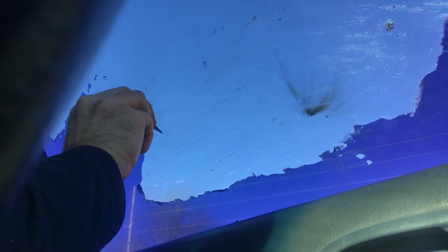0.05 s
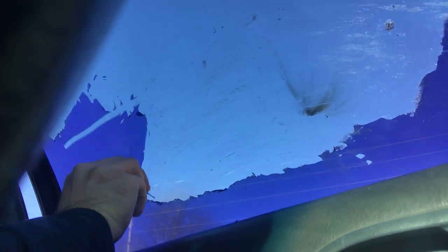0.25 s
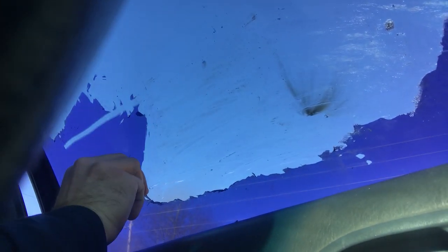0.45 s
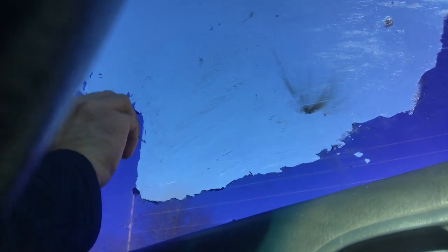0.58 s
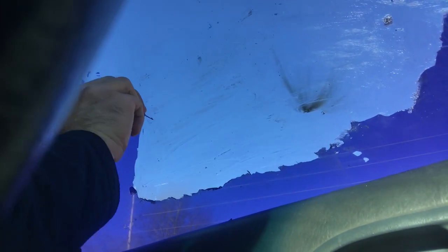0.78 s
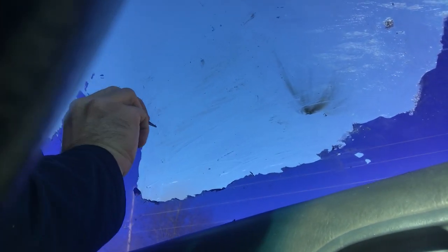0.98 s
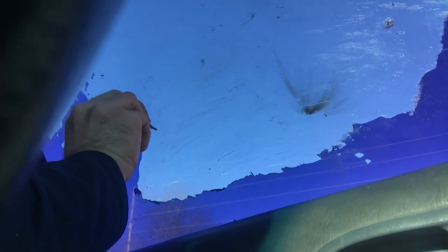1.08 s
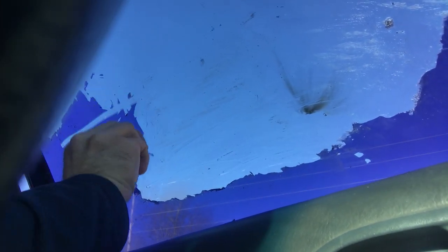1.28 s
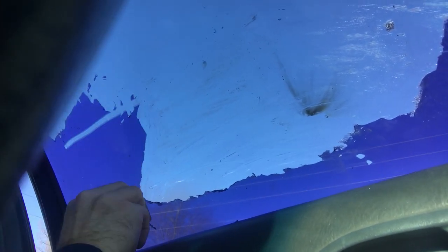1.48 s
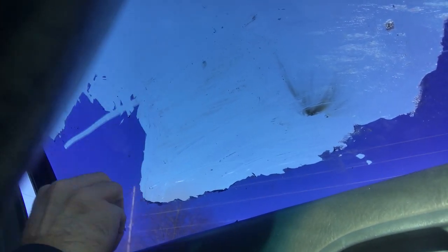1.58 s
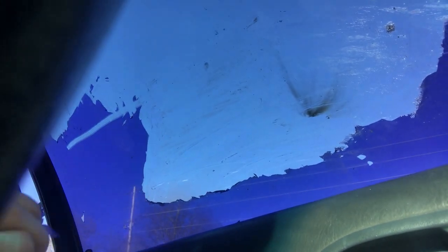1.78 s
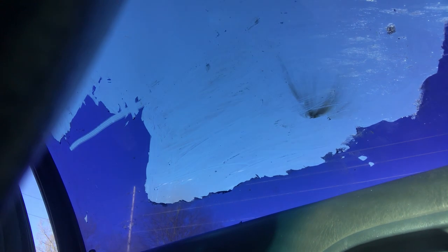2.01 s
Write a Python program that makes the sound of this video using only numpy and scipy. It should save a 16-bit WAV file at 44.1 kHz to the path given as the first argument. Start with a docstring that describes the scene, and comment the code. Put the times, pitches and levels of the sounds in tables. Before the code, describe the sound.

Blade scraping on a car window: two quick gritty strokes, with sharp glassy ticks and dull thuds.

```python
"""Razor blade on a car window

A razor blade scrapes burnt tint film off the inside of a car window, heard from close by in the cabin. Two
strokes rasp down the pane: sprays of tiny fractures ring the pressed blade and the glass, and the edge catches.
Around and between them the blade ticks (short cracks and rings) and scuffs the film (sparser sprays). The pane
thuds in its low modes; filtered noise makes the arm's rumble, sleeve and cabin air."""
import sys
import numpy as np
from scipy import signal
from scipy.fft import rfft, irfft, next_fast_len
from scipy.io import wavfile
from scipy.ndimage import uniform_filter1d, map_coordinates

SR = 44100
rng = np.random.default_rng(int(sys.argv[2]) if len(sys.argv) > 2 else 0)


def transcribe(signal):
    """Save signal, clipped to [-1, 1], as a 16-bit WAV file at the path in sys.argv[1]."""
    frames = np.atleast_2d(signal).T
    limited = np.clip(frames, -1, 1)
    pcm = np.round(limited * 32767).astype(np.int16)
    wavfile.write(sys.argv[1], SR, pcm)


N = 90404  # length in samples

# Rumble of the moving arm, before RUMBLE_DB: start_s, level_db
ARM_MOVES = [(0, -49), (.18, -61), (.28, -44), (.44, -48), (.55, -55.5), (.95, -53), (1.33, -50),
             (1.5, -44), (1.68, -58.5), (1.88, -46.5), (2.05, -65.5)]
# The sleeve brushes past at the end: start_s, level_db
SLEEVE_BRUSH = [(1.87, -70), (1.95, -64), (2.05, -68.5)]
# Noise colours of the rumble and the still air: pitch_hz, relative_level_db
RUMBLE_COLOUR = [(22, -45), (42, 4.5), (80, 1), (125, -3.5), (600, -42), (2000, -69)]
AIR_COLOUR = [(100, -0.5), (700, -7.5), (1500, -12), (7000, -22), (16000, -37.5)]
RUMBLE_DB, AIR_DB = 1, -63.5

# Blade ticks on the glass, before TICK_DB: start_s, level_db, treble_tilt_db_per_octave, favoured_pitch_hz
BLADE_TICKS = [(.0005, -35.5, -4.5, 2100), (0.036, -32, -3, 3050), (0.1352, -28.5, -2.5, 2100),
               (0.395, -42.5, -4, 3400), (0.5525, -33.5, -1, 1790), (0.5747, -35.5, -3, 1940),
               (0.661, -34.5, -3, 2130), (0.7549, -47.5, -10.5, 1220), (0.7915, -32, 0, 2620),
               (0.796, -40, 4.5, 4400), (0.8, -48, -14, 2980), (0.8067, -50, 0, 3100),
               (0.8935, -35, -2.5, 3950), (0.9111, -38.5, -2.5, 2030), (0.9701, -35.5, -0.5, 1950),
               (1.022, -32.5, -1.5, 2150), (1.0356, -38.5, -3.5, 1170), (1.0739, -26, -2, 2850),
               (1.1368, -39, -11, 1220), (1.1468, -37.5, -1.5, 2750), (1.5664, -41.5, -1.5, 6500),
               (1.5895, -26.5, -3.5, 2640), (1.6057, -32.5, -4, 2100), (1.656, -34, -3.5, 2400),
               (1.661, -40.5, -0.5, 6000), (1.677, -41.5, -8.5, 6160), (1.695, -41.5, -5, 6170),
               (1.707, -44, -5, 6100), (1.7186, -44.5, -6.5, 6140), (1.806, -36.5, 0, 995),
               (1.826, -45, -6, 1840)]
# Resonances of the tapped blade and glass, before a random change per tick: pitch_hz, relative_level_db
TAPPED_BLADE = [(950, -4), (1220, -2.5), (1550, -7), (2100, 0), (2330, 0), (3040, -0.5), (3500, -3),
                (4390, -14), (6000, -9), (6600, -12)]
# Noise colour of a tick's crack: pitch_hz, relative_level_db
CRACK_COLOUR = [(150, 7), (400, -4), (800, -11), (1300, -0.5), (6800, -9), (10000, -21), (16000, -28)]
BLADE_WIDTH_HZ, BLADE_LOSS = 110, 0.05  # resonance width: a fixed part plus a share of the pitch
TICK_DB, CRACK_DB, CRACK_T60_S = 15, 2.5, 0.018  # energy of a tick; its crack against its ring; crack decay
FAVOUR_DB, FAVOUR_OCTAVES = 4.5, 0.35  # boost near the favoured pitch, and its spread
BEND_S = 0.002622  # travel time of a 1 kHz bending wave in the glass; treble arrives first
TOP_HZ = 16150  # nothing is kept from here up

# The pane thuds, before THUD_DB: start_s, level_db, centre_hz
PANE_THUDS = [(0.136, -37.5, 205), (0.2021, -23, 190), (0.2274, -36, 262), (.285, -33, 168),
              (0.358, -37.5, 352), (0.8015, -31, 157), (0.933, -38, 209), (1.046, -37.5, 170),
              (1.081, -36.5, 158), (1.138, -39, 142), (1.171, -37.5, 111), (1.381, -26, 424),
              (1.381, -25, 96), (1.4719, -25.5, 147), (1.509, -31.5, 111), (1.593, -35.5, 106),
              (1.829, -45.5, 109)]
# Low modes of the pane in its frame, before small random changes: pitch_hz, level_db, decay_60db_s
PANE_MODES = [(78.06, -14, 0.86), (107.4, -3.5, 0.15), (142, 2, 0.052), (180, -2.5, 0.055),
              (248, -7.5, 0.048), (408, -3, 0.061)]
THUD_DB, THUD_RISE_S, THUD_OCTAVES = 5, 0.0039, 0.7  # octaves: spread of modes that one thud reaches

# The edge catches in the film: start_s, level_db, decay_60db_s
EDGE_CATCHES = [(0.2009, -22, 0.023), (.2230, -28.5, 0.097), (.2375, -33.5, 0.05), (.288, -39, 0.026),
                (.3548, -31.5, 0.053), (1.3715, -36, 0.055), (1.3822, -33.5, 0.054), (1.4664, -29.5, 0.06),
                (1.4805, -33, 0.024)]
# Light scuffs of the film: start_s, level_db, decay_60db_s
LIGHT_SCUFFS = [(.602, -44.5, 0.068), (.899, -55, 0.19), (.936, -44.5, 0.019), (1.657, -40, 0.077),
                (1.8053, -37.5, 0.028), (1.826, -39.5, 0.066), (1.841, -43, 0.08)]
# Colours of catches and scuffs; the sleeve shares the scuff colour: pitch_hz, relative_level_db
CATCH_COLOUR = [(100, 9), (280, 15.5), (700, -1.5), (2000, -2), (3800, 2), (5200, -14.5), (8000, -24),
                (16000, -53)]
SCUFF_COLOUR = [(200, -3), (600, 0.5), (1700, 1.5), (3300, -6.5), (6500, -23), (16000, -43)]
# A light scuff breaks fewer flakes
GRAINS_PER_S, SCUFF_GRAINS_PER_S, GRAIN_SPREAD_DB = 5000, 800, 1.5
# Bending modes of the scraped pane, against the direct sound: pitch_hz, level_db
GLASS_MODES = [(603, 7), (732, 5), (1065, 4), (1200, 9), (1600, 3), (1860, 1), (2505, 10), (3100, 2)]
GLASS_WIDTH_HZ = 30

# The two strokes, before the gains below: start_s, hiss_level_db, coarse_rasp_level_db, treble_level_db
FIRST_STROKE = [(.208, -66, -58, -57), (.223, -42.5, -41, -47.5), (.25, -40, -48.5, -48),
                (.278, -37.5, -49.5, -44), (.31, -47, -56, -56.5), (.349, -51.5, -66, -56),
                (.358, -42, -46.5, -63.5), (.398, -51, -54.5, -56), (.42, -88, -107, -82)]
SECOND_STROKE = [(1.381, -51, -42, -43), (1.39, -49, -52, -53), (1.41, -44.5, -57, -48.5),
                 (1.445, -46, -52.5, -50.5), (1.464, -46.5, -58.5, -52), (1.477, -37.5, -39, -42),
                 (1.495, -47, -47, -52.5), (1.515, -62, -66.5, -67), (1.55, -65, -75, -68)]
HISS_DB, RASP_DB, TREBLE_DB = 1, 5, 0
# Resonances of the blade pressed on the pane, before the grip retunes them: pitch_hz, width_hz, relative_level_db
PRESSED_BLADE = [(2590, 210, -2), (3347, 260, 1.5), (4110, 140, -4.5), (4510, 170, -10.5)]
# The grip retunes the pressed blade: start_s, pitch_ratio
GRIP_TUNING = [(0.279, 1.027), (0.359, .93), (1.384, 1.065), (1.449, 1.18), (1.475, 1.02)]
# Colours of the coarse rasp and the treble fizz: pitch_hz, relative_level_db
RASP_COLOUR = [(100, -4.5), (260, 15), (500, 0.5), (2400, 3), (4500, -28), (9000, -86)]
TREBLE_COLOUR = [(2500, -19), (4500, 1), (5500, 1), (7000, 2), (10500, -10), (16000, -19)]
SLIPS_PER_S, SLIP_T60_S, SLIP_DB = 130, 0.02, 4.5

# How long the car's interior answers: pitch_hz, decay_60db_s
CABIN_DECAY = [(150, 0.25), (1500, 0.037), (4000, 0.053), (12000, 0.014)]
CABIN_DB, CABIN_DELAY_S = -11.5, 0.003
LOW_CUT_HZ = 34.6


def amp(db):
    """Turn a level in dB into a gain."""
    return 10 ** (np.asarray(db) / 20)


def unit(x):
    """Scale x to an average strength (rms) of 1."""
    return x / np.sqrt(np.mean(x ** 2) + 1e-20)


def along(points, hz):
    """Read a curve of (Hz, value) points on a log pitch axis."""
    pitch, value = np.transpose(points)
    return np.interp(np.log(hz + 1), np.log(pitch + 1), value)


def bump(hz, centre_hz, octaves):
    """A bell on a log pitch axis, 1 at its centre."""
    distance = np.log2((hz + 1) / centre_hz) / octaves
    return np.exp(-0.5 * distance ** 2)


def levels(rows):
    """One gain per sample for each dB column, silent outside the rows."""
    times, *columns = np.transpose(rows)
    now = np.arange(N) / SR
    curves = [np.interp(now, times, column, left=-np.inf, right=-np.inf) for column in columns]
    return [uniform_filter1d(amp(curve), size=64) for curve in curves]


def filtered(x, response):
    """Filter x by a complex response, given as a function of pitch."""
    size = next_fast_len(2 * len(x))
    hz = np.fft.rfftfreq(size, 1 / SR)
    return irfft(rfft(x, size) * response(hz), size)[:len(x)]


def coloured(x, spectrum):
    """Give x a spectrum with a filter that never sounds before its input."""
    def response(hz):
        # Folding the log spectrum's echoes forward in time makes the filter minimum phase
        cepstrum = irfft(np.log(amp(along(spectrum, hz))), 2 * len(hz) - 2)
        half = len(cepstrum) // 2
        cepstrum[1:half] *= 2
        cepstrum[half + 1:] = 0
        return np.exp(rfft(cepstrum))
    return filtered(x, response)


def resonance(f, centre_hz, width_hz):
    """Response of one ringing mode, 1 at its centre."""
    return 1j * f * width_hz / (centre_hz ** 2 - f * f + 1j * f * width_hz)


def resonate(x, modes):
    """Ring x through (Hz, width, dB) resonances of alternating sign."""
    def response(f):
        return sum((-1) ** k * amp(db) * resonance(f, centre, width)
                   for k, (centre, width, db) in enumerate(modes))
    return filtered(x, response)


def dying(t, t60):
    """A decay of 60 dB in t60 seconds."""
    return np.exp(-np.log(1000) * t / t60)


def add(track, s, sound):
    """Mix a sound into the track at time s."""
    i = max(round(s * SR), 0)
    track[i:i + len(sound)] += sound[:N - i]


def background():
    """Filtered noise for the moving arm's rumble, its brushing sleeve and the still cabin air."""
    def noise(spectrum):
        return unit(coloured(rng.standard_normal(N), spectrum))
    rumble = amp(RUMBLE_DB) * levels(ARM_MOVES)[0] * noise(RUMBLE_COLOUR)
    sleeve = levels(SLEEVE_BRUSH)[0] * noise(SCUFF_COLOUR)
    return rumble + sleeve + amp(AIR_DB) * noise(AIR_COLOUR)


def bend(f):
    """Bending waves in glass travel faster at higher pitch, so low pitches arrive later than TOP_HZ."""
    return np.exp(-4j * np.pi * BEND_S * (np.sqrt(1000 * f) - f * np.sqrt(1000 / TOP_HZ) / 2))


def ticks():
    """Each contact rings the blade with a short crack; the glass smears it into a quick falling chirp."""
    out, t = np.zeros(N), np.arange(4096) / SR
    for s, db, tilt_db, favoured_hz in BLADE_TICKS:
        modes = [(hz, BLADE_WIDTH_HZ + BLADE_LOSS * hz, level + 2 * rng.normal())
                 for hz, level in TAPPED_BLADE]
        ring = resonate(1.0 * (t == 0), modes)
        crack = coloured(rng.standard_normal(len(t)) * dying(t, CRACK_T60_S), CRACK_COLOUR)

        def contact(f):
            tilt = tilt_db * np.log2(np.clip(f, 800, 5000) / 3000)
            favour = FAVOUR_DB * bump(f, favoured_hz, FAVOUR_OCTAVES)
            return bend(f) * amp(tilt + favour)
        tick = filtered(unit(ring) + amp(CRACK_DB) * unit(crack), contact)
        add(out, s, amp(db + TICK_DB) * tick / np.linalg.norm(tick))
    return out


def thuds():
    """Each thud swings the pane in the low modes that lie near its centre."""
    out, t = np.zeros(N), np.arange(SR // 3) / SR
    rise = 1 - np.exp(-t / THUD_RISE_S)
    for s, db, centre_hz in PANE_THUDS:
        swing = np.zeros(len(t))
        for hz, level, t60 in PANE_MODES:
            gain = amp(level + rng.normal()) * bump(hz, centre_hz, THUD_OCTAVES)
            pitch = hz * (1 + 0.022 * rng.normal())
            swing += gain * np.sin(2 * np.pi * pitch * t) * dying(t, t60)
        add(out, s, amp(db + THUD_DB) * swing * rise)
    return out


def grains(n, rate=GRAINS_PER_S):
    """Tiny fractures of the brittle film: impulses of uneven size, about rate a second."""
    hit = rng.random(n) < rate / SR
    sign = np.sign(rng.standard_normal(n))
    return hit * sign * amp(GRAIN_SPREAD_DB * rng.standard_normal(n))


def bursts(rows, spectrum, rate, rise_s):
    """Short slips of the edge: each is a spray of fractures that rises and dies."""
    out, t = np.zeros(N), np.arange(SR // 6) / SR
    rise = 1 - np.exp(-t / rise_s)
    for s, db, t60 in rows:
        spray = unit(coloured(grains(len(t), rate), spectrum))
        add(out, s, amp(db) * spray * rise * dying(t, t60))
    return out


def glass(x):
    """Let the narrow bending modes of the pane ring on top of x."""
    def response(f):
        return 1 + sum(amp(db) * resonance(f, centre, GLASS_WIDTH_HZ) for centre, db in GLASS_MODES)
    return filtered(x, response)


def catches():
    """The edge catches in the film: dense, sudden sprays of fractures that ring the pane."""
    return glass(bursts(EDGE_CATCHES, CATCH_COLOUR, GRAINS_PER_S, rise_s=0.00029))


def chatter():
    """Stick and slip: at uneven moments a flake gives way, and the gain jumps and sags."""
    slips = (rng.random(N) < SLIPS_PER_S / SR) * rng.uniform(0.23, 1, N)
    sag = dying(np.arange(SR // 10) / SR, SLIP_T60_S)
    return unit(1 + amp(SLIP_DB) * signal.fftconvolve(slips, sag)[:N])


def stroke(rows):
    """The sliding edge shatters the film: grains ring the pressed blade, rasp in the pane and fizz."""
    hiss, rasp, treble = chatter() * np.array(levels(rows))
    tuning = np.interp(np.arange(N) / SR, *np.transpose(GRIP_TUNING))
    # Reading the ringing faster or slower shifts its pitch
    ring = map_coordinates(resonate(grains(2 * N), PRESSED_BLADE), [np.cumsum(tuning)])
    coarse = rasp * unit(coloured(grains(N), RASP_COLOUR))
    fizz = treble * unit(coloured(grains(N), TREBLE_COLOUR))
    return amp(HISS_DB) * hiss * unit(ring) + amp(RASP_DB) * glass(coarse) + amp(TREBLE_DB) * fizz


def scuffs():
    """The blade lightly scuffs the film: sparser sprays of fractures with a softer rise."""
    return bursts(LIGHT_SCUFFS, SCUFF_COLOUR, SCUFF_GRAINS_PER_S, rise_s=0.0015)


def cabin(x):
    """The short, padded answer of the car's interior: an echo tail of noise that dies by pitch."""
    hz, t, noise = signal.stft(rng.standard_normal(SR // 4), SR, nperseg=128)
    decay = dying(t, along(CABIN_DECAY, hz)[:, None])
    tail = signal.istft(noise * decay, SR, nperseg=128)[1]
    delayed = np.pad(x, (round(CABIN_DELAY_S * SR), 0))
    return signal.fftconvolve(delayed, tail / np.linalg.norm(tail))[:N]


def scene():
    """Blade, pane and cabin in one channel."""
    slips = catches() + scuffs()
    blade = ticks() + slips + stroke(FIRST_STROKE) + stroke(SECOND_STROKE)
    return (blade + amp(CABIN_DB) * cabin(blade) + thuds() + background())[None]


def record(dry):
    """Thin the deepest bass and keep nothing from TOP_HZ up."""
    def response(hz):
        return (1j * hz / (1j * hz + LOW_CUT_HZ)) ** 2 * (hz < TOP_HZ)
    return np.array([filtered(x, response) for x in dry])


dry = scene()
out = record(dry)
transcribe(out)
```